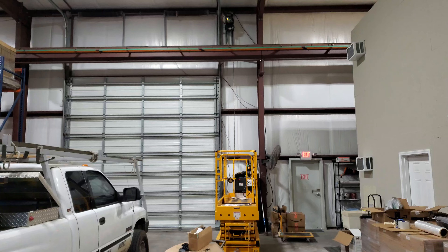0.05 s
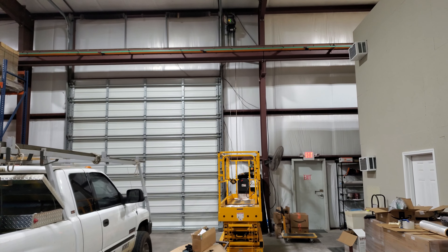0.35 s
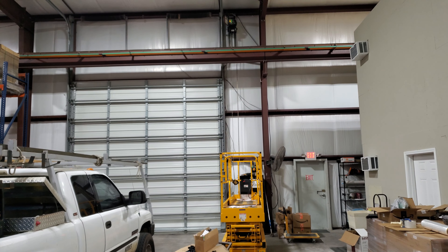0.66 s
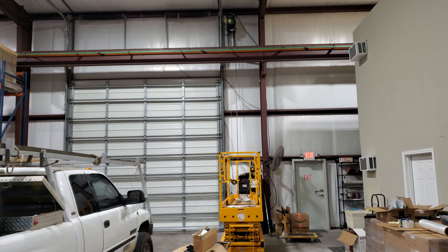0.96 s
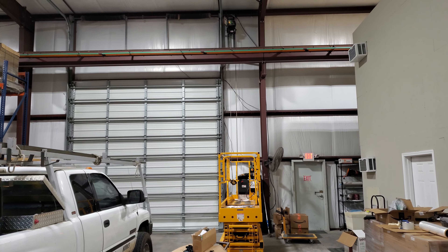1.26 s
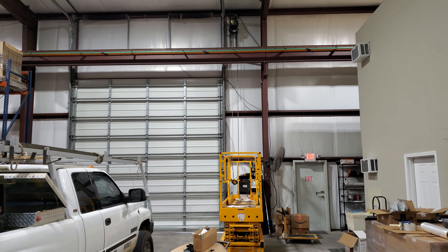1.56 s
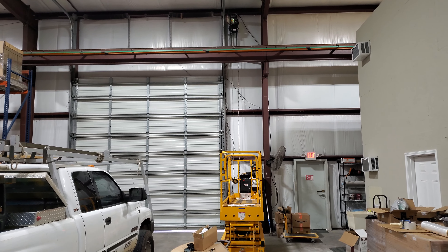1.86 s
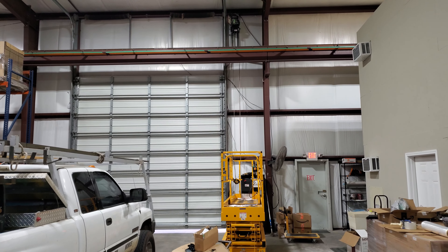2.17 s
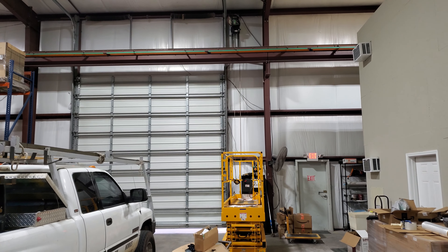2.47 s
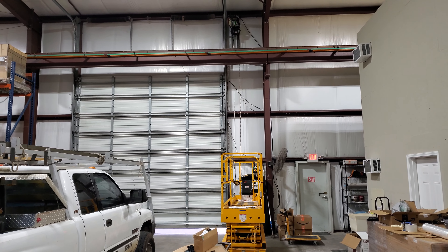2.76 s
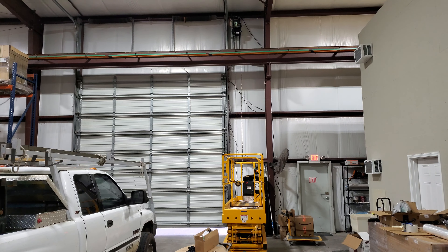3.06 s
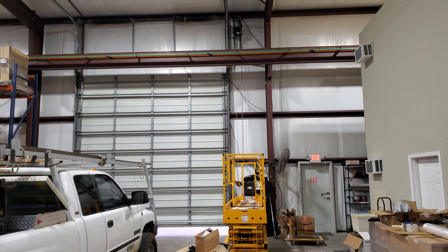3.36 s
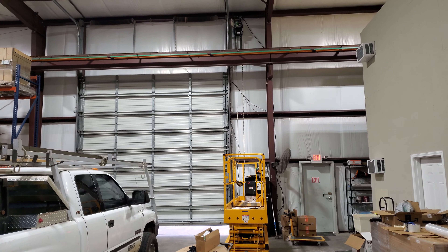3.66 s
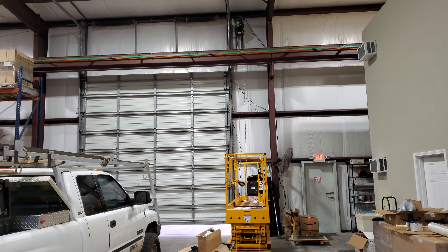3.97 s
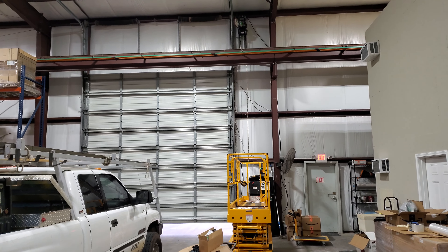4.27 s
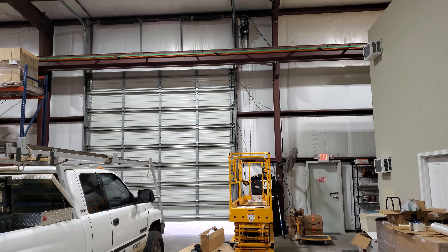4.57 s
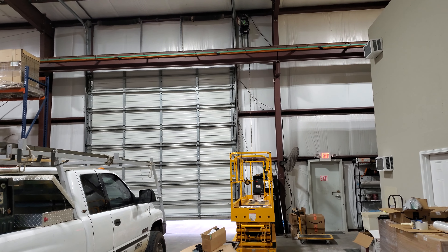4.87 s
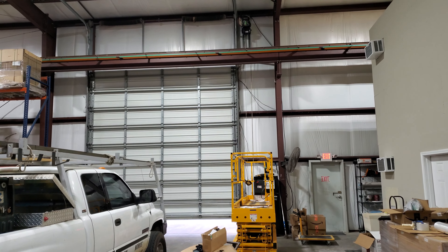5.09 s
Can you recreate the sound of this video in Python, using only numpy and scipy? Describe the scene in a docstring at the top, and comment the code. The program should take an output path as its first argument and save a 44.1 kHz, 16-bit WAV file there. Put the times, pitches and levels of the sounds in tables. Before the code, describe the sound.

A button clicks, a switch clacks, and a motorized overhead door rises with a hum, rumble and rattle in an echoing warehouse.

```python
"""A motorized sectional door starts to rise in a large steel warehouse.
First, over the low noise of the air, a push button clicks and creaks nearby. The motor's starter
switch clacks shut and the motor hums on mains power. Then the door panels rumble, rollers rattle
in their tracks, the chain jingles and hinges clank, all far off and washed in the hall's echo."""
import sys
import numpy as np
from scipy import signal
from scipy.fft import rfft, irfft, next_fast_len
from scipy.io import wavfile

SR = 44100
rng = np.random.default_rng(int(sys.argv[2]) if len(sys.argv) > 2 else 0)


def put_to_file(sound):
    """Save the sound as 16-bit audio at rate SR, in the file named by the first command-line argument."""
    columns = np.atleast_2d(sound).T  # one column per channel
    safe = np.clip(columns, -1, 1)
    whole_steps = np.round(safe * 32767)
    wavfile.write(sys.argv[1], SR, whole_steps.astype(np.int16))


N = 341334
TIME = np.arange(N) / SR
BLOW_SAMPLES = 2 ** 15  # room for one blow to die away
SWITCH_ON_S, RUN_UP_S = 1.2423, .06  # when the motor starts; how long the door's noise takes to come in
RUNNING_S = np.maximum(TIME - SWITCH_ON_S, 0)


def gain_of(db):
    """Turns decibels (dB) into a number to multiply a sound by."""
    return 10 ** (np.asarray(db) / 20)


def evened(x):
    """Scales a signal to an average strength (rms) of 1."""
    return x / np.sqrt(np.mean(x ** 2) + 1e-20)


def read(points, hz):
    """Looks up a table by frequency, sliding smoothly between its rows."""
    table_hz, value = np.transpose(points)
    return np.interp(np.log(hz + 1), np.log(table_hz + 1), value)


def level(points):
    """Joins rows of seconds and dB into a loudness curve."""
    return gain_of(np.interp(TIME, *np.transpose(points)))


def swell(peak_s, half_s):
    """A bell-shaped rise and fall, down to about a third at half_s either side of its peak."""
    return np.exp(-((TIME - peak_s) / half_s) ** 2)


def dying(fade_s):
    """A fade from 1. Every fade time here is the time taken to fall by 60 dB."""
    return np.exp(-np.log(1000) * TIME[:BLOW_SAMPLES] / fade_s)


def drift(rate_hz):
    """A random wobble of strength 1, mostly slower than rate_hz."""
    t = TIME[::64]
    hz = np.fft.rfftfreq(len(t), t[1])
    slow = rfft(rng.standard_normal(len(t))) / (1 + (hz / rate_hz) ** 2)
    return evened(np.interp(TIME, t, irfft(slow, len(t))))


def add(mix, start_s, sound):
    """Lays a stereo sound into the mix."""
    part = mix[:, round(start_s * SR):][:, :sound.shape[1]]
    part += sound[:, :part.shape[1]]


# How alike left and right are. Each row: frequency in Hz, likeness (1 the same, 0 unrelated).
STEREO_LIKENESS = [(130, 1), (300, 0.9), (600, 0.85), (1000, 0.32), (2000, -0.03), (4000, 0.2),
                   (8000, -0.02), (16000, 0.03)]
# How far the left wave runs ahead of the right. Each row: frequency in Hz, lead in radians.
LEFT_LEAD = [(400, 0.09), (860, 0.77), (1640, 0.75), (3100, -.5), (5000, -1.4), (7400, -0.49),
             (10000, -2.5), (16000, -2.35)]
# Which side is louder. Each row: frequency in Hz, left minus right in dB.
LEFT_BALANCE = [(60, -2), (150, -2.5), (300, 1), (1700, -0.9), (2500, 2.5), (3500, 0), (5000, -2.5),
                (6700, -2.5), (7900, 2), (10300, 3.5), (11600, -1), (14500, 5.5)]

def noise(colour, size=BLOW_SAMPLES, tilt_db=0):
    """Stereo noise of strength 1. The colour sets its tone; tilt_db per octave brightens it."""
    padded = next_fast_len(size, True)
    hz = np.fft.rfftfreq(padded, 1 / SR)
    left, unrelated = rfft(rng.standard_normal((2, size)), padded)
    same = np.clip(read(STEREO_LIKENESS, hz), -1, 1)
    right = (same * left + np.sqrt(1 - same ** 2) * unrelated) * np.exp(-1j * read(LEFT_LEAD, hz))
    side = gain_of(read(LEFT_BALANCE, hz) / 2)
    shape = gain_of(read(colour, hz) + tilt_db * np.log2(np.maximum(hz, 400) / 1000))
    return evened(irfft(np.array([left * side, right / side]) * shape, padded)[:, :size])


# How long the hall echoes. Each row: frequency in Hz, fade time in seconds.
HALL_FADE = [(100, 1.8), (500, 1.2), (1500, 0.99), (3000, 1.14), (6000, 0.77), (11000, 0.65), (16000, 0.58)]

def echo(colour, tilt_db=0, lasting=1):
    """The hall answers a blow with a blur of reflections; the treble dies first."""
    hz, t, slices = signal.stft(noise(colour, tilt_db=tilt_db), SR, nperseg=256)
    fade = gain_of(-60 * t / (lasting * read(HALL_FADE, hz)[:, None]))
    return signal.istft(slices * fade, SR, nperseg=256)[1][:, :BLOW_SAMPLES]


def ring(tones, extra_db=0):
    """A struck thing rings with all its tones; higher ones differ more between left and right."""
    hz, db, fade_s = np.transpose(tones)
    waves = np.exp((2j * np.pi * hz - np.log(1000) / fade_s)[:, None] * TIME[:BLOW_SAMPLES])
    start, apart = rng.uniform(-1.06, 1, (2, len(hz)))
    phase = np.pi * start + np.outer([1, -1], apart) * np.minimum(hz / 1600, 1)
    return ((gain_of(db + extra_db) * np.exp(1j * phase)) @ waves).imag


# The tone of the hall's air. Each row: frequency in Hz, relative level in dB.
AIR_COLOUR = [(20, -29), (35, -24), (55, 8), (100, -1.5), (200, -9), (300, -13.5), (450, -24), (650, -36.5),
              (1200, -38.5), (3000, -44.5), (7000, -54), (11000, -51), (16000, -43)]

def air():
    """The air in the hall makes a low, steady noise."""
    return gain_of(-55) * noise(AIR_COLOUR, size=N)


# The button's snaps. Each row: start in seconds, level in dB, pitch in Hz, fade time in seconds,
# scrape level in dB compared with the snap.
BUTTON_SNAPS = [(.6636, -33, 1940, 0.021, -18), (1.031, -58.5, 1475, 0.076, 8),
                (1.1033, -39.5, 1870, 0.027, -22), (1.114, -45.5, 3760, 0.065, -3),
                (1.149, -57, 3880, 0.038, 16), (1.2246, -35, 4850, 0.067, -1.5)]
# The tones of its housing. Each row: multiple of the snap's pitch, relative level in dB.
HOUSING_TONES = [(.66, -21), (.79, -9), (1, 1), (1.26, -18), (1.6, -12), (1.88, -12)]
# The tones of its spring. Each row: pitch in Hz, relative level in dB, fade time in seconds.
SPRING_TONES = [(1440, -9, 0.25), (1690, -6, 0.23), (3550, -2, 0.2), (3940, -3, 0.25), (4220, -10, .3),
                (6300, -12, .3), (6750, -11, .25)]
# The spring's bright scrape. Each row: frequency in Hz, relative level in dB.
SCRAPE_COLOUR = [(200, -2), (900, -10.5), (1500, -0.5), (2600, -11.5), (3900, 2), (5100, -7), (6600, -3),
                 (8300, -13), (10200, -3.5), (12000, -10), (14000, -5), (16000, -4.5)]

def button():
    """Each snap rings the button's housing and scrapes its spring; a longer scrape echoes more."""
    out = np.zeros((2, N))
    for start_s, db, hz, fade_s, scrape_db in BUTTON_SNAPS:
        tones = [(hz * multiple, tone_db, fade_s) for multiple, tone_db in HOUSING_TONES]
        housing = ring(tones) * (1 - dying(.006))
        echo_colour = [(hz / 3, -40), (hz * .75, -15), (hz * .86, -8), (hz, 0),
                       (hz * 1.3, -13), (hz * 1.9, -11), (hz * 2.6, -34), (hz * 8, -45)]
        snap = 1.2 * housing + gain_of(-24.5) * echo(echo_colour, lasting=.34)
        tail = gain_of(-5) * echo(SCRAPE_COLOUR, lasting=.52) + gain_of(-11.5) * ring(SPRING_TONES)
        scrape = noise(SCRAPE_COLOUR) * dying(fade_s * 1.5) + (fade_s / .051) ** 1.65 * tail
        add(out, start_s, gain_of(db) * (snap + gain_of(scrape_db) * scrape))
    return out


# The starter's slam and bounces. Each row: start in seconds, level in dB.
STARTER_HITS = [(1.2423, -16), (1.2466, -10.5), (1.2497, -16.5), (1.2572, -19)]
# The tones of its steel box. Each row: pitch in Hz, relative level in dB, fade time in seconds.
BOX_TONES = [(738, -14, .9), (792, -19, .6), (858, -2, .25), (1130, -16, .5), (1225, -11, .5),
             (1393, -12, .45), (1447, -8, .38), (1690, -16, .45), (1723, -15, .37), (2660, -17, .6),
             (2757, -16, .6), (2890, -16, .45), (3736, -18, .45), (4443, -11, .38), (4531, -14, .38),
             (4875, -14, .38), (5426, -18, .5), (6438, -22, .5), (9055, -21, .36), (10001, -18, .35),
             (10414, -17, .3), (11148, -11, .27), (11351, -12, .27)]
# The tone of the clack and of its echo. Each row: frequency in Hz, relative level in dB.
CLACK_COLOUR = [(60, -20), (500, -18), (850, -7), (1500, 6), (2250, -8.5), (2700, -1.5), (4600, -1.5),
                (6600, -3.5), (7100, -5), (8700, -5), (10000, -1), (11400, 6.5), (11900, -3), (16000, -8.5)]
CLACK_ECHO_COLOUR = [(50, 8), (130, 7.5), (300, 3), (700, -5), (1400, 5.5), (2200, -1.5), (3000, 2),
                     (5000, 3), (6500, 0.5), (7300, -5), (8800, -3.5), (11200, 2), (12200, -3),
                     (16000, -1.5)]

def starter():
    """The starter switch slams shut and bounces; its box rings on and the hall fills with echo."""
    out = np.zeros((2, N))
    clack = noise(CLACK_COLOUR) * (dying(.046) + .19 * dying(.076)) * (1 - dying(.002))
    for start_s, db in STARTER_HITS:
        add(out, start_s, gain_of(db) * clack)
    slam_s = STARTER_HITS[0][0]
    add(out, slam_s, gain_of(-21.5) * ring(BOX_TONES) * (1 - dying(.02)))
    add(out, slam_s, gain_of(-21) * echo(CLACK_ECHO_COLOUR) * (1 - dying(.06)))
    return out


# The hum's pitch sags briefly. Each row: time in seconds, pitch in Hz.
MOTOR_PITCH = [(1.3, 119), (1.6, 118.2), (1.8, 120)]
# The buzz from the first rush of current. Each row: multiple of the hum's pitch, peak level in dB.
BUZZ_TONES = [(2, -31.7), (3, -41), (4, -43.5)]
# The running hum, and the tone an octave above it. Each row: time in seconds, level in dB.
HUM_LEVEL = [(1.7, -39.0), (1.8, -30.7), (2.06, -36.3), (2.45, -30.0), (3.65, -32.2), (3.79, -39.0),
             (3.91, -31.9), (4.39, -40.0), (4.52, -32.5), (4.86, -40.4), (5.05, -32.5), (5.29, -34.8),
             (6.45, -32.3), (6.58, -38.8), (6.75, -30.7), (7.02, -36.1), (7.06, -31.3), (7.7, -31.6)]
OCTAVE_LEVEL = [(1.7, -48), (2.5, -60), (3.1, -51), (4.4, -51), (5.0, -44.3), (5.9, -46), (6.15, -51),
                (6.7, -47), (7.7, -47.5)]

def motor():
    """Magnetism makes the motor hum at twice the mains frequency; it surges as it takes the load."""
    surge_db, rise_s, hold_s, fall_s = -25.5, .18, .16, .096
    hz = np.interp(TIME, *np.transpose(MOTOR_PITCH))
    angle = 2 * np.pi * np.cumsum(hz) / SR + .05 * drift(3)
    at_speed = np.clip((RUNNING_S - rise_s - hold_s) / fall_s, 0, 1)
    surge = gain_of(surge_db) * np.minimum(RUNNING_S / rise_s, 1) ** 2 * (1 - at_speed) * np.sin(angle)
    current_rush = swell(SWITCH_ON_S + .15, half_s=.072) * (RUNNING_S > 0)
    buzz = current_rush * sum(gain_of(db) * np.sin(multiple * angle) for multiple, db in BUZZ_TONES)
    hum = level(HUM_LEVEL) * np.sin(angle) + level(OCTAVE_LEVEL) * np.sin(2 * angle)
    waver = gain_of(.4 * drift(5))
    left_right = gain_of([[-1], [.8]])
    return np.sqrt(2) * (surge + buzz + at_speed * waver * hum) * left_right


# The tone of the panels' rumble. Each row: frequency in Hz, relative level in dB.
RUMBLE_COLOUR = [(15, -36), (30, -28), (48, -3.5), (62, -5), (76, 3.5), (88, -1.5), (100, 4.5), (118, -7.5),
                 (150, -2), (178, -8), (205, -6), (260, -12.5), (340, -18.5), (600, -47)]
# How loud they rumble. Each row: time in seconds, level in dB.
PANEL_LEVEL = [(1.3, -31.5), (1.5, -36), (2.0, -34.5), (2.45, -39.5), (3.45, -36), (4.0, -39), (5.5, -39.5),
               (6.9, -38.5), (7.35, -35), (7.7, -38)]
# Their own low notes. Each row: peak time in seconds, half length in seconds, pitch in Hz, level in dB.
PANEL_NOTES = [(1.38, .14, 200, -48), (1.42, .06, 286, -46), (1.893, .099, 230, -44.5),
               (1.923, .12, 152, -44), (2.25, .2, 200, -47), (5.518, .12, 156.7, -45),
               (6.17, 0.29, 158, -37), (6.95, 0.72, 137.9, -39)]

def panels():
    """The big sheets rumble, and now and then one of their own notes swells and fades."""
    out = np.minimum(RUNNING_S / RUN_UP_S, 1) * level(PANEL_LEVEL) * noise(RUMBLE_COLOUR, size=N)
    waver = .7 * drift(5.4)
    for peak_s, half_s, hz, db in PANEL_NOTES:
        out += np.sqrt(2) * gain_of(db) * swell(peak_s, half_s) * np.sin(2 * np.pi * hz * TIME + waver)
    return out


def moving(base_db, jerk_db=0, settle_s=.1, growth_db_per_s=0, uneven_db=.25):
    """A moving part's loudness: it may start with a jerk, and grow as more panels ride over the bend."""
    jerk = jerk_db * np.exp(-RUNNING_S / settle_s)
    db = base_db + jerk + growth_db_per_s * RUNNING_S + uneven_db * drift(3)
    return np.minimum(RUNNING_S / RUN_UP_S, 1) * gain_of(db)


def knocking(colour, per_s, spread_db, burst):
    """Tiny knocks come from all over the door; each is a short burst, then a long echo."""
    knocks = rng.random(N) < per_s / SR
    strength = gain_of(spread_db * np.minimum(rng.exponential(1, N), 3))
    fade = dying(1) + burst * dying(.08)
    power = signal.oaconvolve(knocks * strength ** 2, fade ** 2)[:N]
    return evened(np.sqrt(abs(power))) * noise(colour, size=N)


def repeated(taps, sound):
    """Plays the same sound at every tap, and scales the result to strength 1."""
    return evened(signal.oaconvolve(taps[None], sound, axes=1)[:, :N])


# Moments when the wheels grind harder or run free. Each row: peak time in seconds,
# half length in seconds, extra rolling in dB, extra rattle in dB.
GRIND_MOMENTS = [(1.85, .12, 2, 2), (3.47, .14, 2.5, 1), (3.87, .12, 4, 5), (4.28, .11, 2, 3.2),
                 (4.65, .1, 1, 3.5), (4.86, .06, -2, -3), (5.03, .08, .5, 2.5), (5.52, .09, 1, 4.5),
                 (6.13, .1, -.5, -2), (6.7, .35, 2.3, 1.2), (7.45, .45, 0, 2.9)]
# The tone of the wheels, loose parts and chain. Each row: frequency in Hz, relative level in dB.
ROLL_COLOUR = [(120, -3.5), (300, 1.5), (560, 2.5), (660, 0), (880, -1), (1100, -8), (1500, -7),
               (2500, -38), (6000, -34)]
RATTLE_COLOUR = [(300, -15), (700, -6.5), (1150, 2.5), (1500, -0.5), (1800, 1), (2100, -.5), (2450, -7),
                 (3100, -8), (5000, -26), (16000, -54)]
JINGLE_COLOUR = [(1500, -20), (2400, -1.5), (3100, 0.5), (3500, 2), (3950, -2.5), (4300, -1.5),
                 (4520, -3.5), (4800, -4.5), (5500, -9), (6900, -10.5), (8500, -15), (16000, -30)]
# The steel hinges and tracks. Each row: pitch in Hz, relative level in dB, fade time in seconds.
STEEL_TONES = [(550, -4, .4), (799, -3.5, 0.6), (910, 2.5, 0.35), (1072, -0.5, 0.53), (1310, -3, 0.84),
               (1710, -3, 0.3), (2050, 2.5, 0.31), (2680, 2, 0.35), (2800, -9, 0.64), (2940, -2.5, 0.35),
               (3156, -1, 0.25), (3570, -7, .3), (4360, -16, 0.25), (5005, -10, 0.2)]

def rollers():
    """Wheels roll in the tracks, shake loose parts into ringing and set the chain jingling."""
    roll_grind = gain_of(sum(db * swell(peak_s, half_s) for peak_s, half_s, db, _ in GRIND_MOMENTS))
    rattle_grind = gain_of(sum(db * swell(peak_s, half_s) for peak_s, half_s, _, db in GRIND_MOMENTS))
    roll_gain = moving(-47.7, jerk_db=7, settle_s=1.1, uneven_db=.3) * roll_grind
    roll = knocking(ROLL_COLOUR, per_s=90, spread_db=2, burst=1.5)
    taps = (rng.random(N) < 120 / SR) * rng.standard_normal(N)  # about 120 a second
    ringing = gain_of(-12.5) * repeated(taps, ring(STEEL_TONES) * dying(.12))
    rattle_gain = moving(-53.5, growth_db_per_s=1.05) * rattle_grind
    rattle = knocking(RATTLE_COLOUR, per_s=260, spread_db=.5, burst=1.8) + ringing
    jingle_gain = moving(-52.3, jerk_db=1, growth_db_per_s=.08) * roll_grind ** .3
    jingle = knocking(JINGLE_COLOUR, per_s=140, spread_db=.5, burst=2.5)
    return roll_gain * roll + rattle_gain * rattle + jingle_gain * jingle


# The tone of the drive's hiss. Each row: frequency in Hz, relative level in dB.
HISS_COLOUR = [(500, -13), (3000, 5), (5000, -1), (7000, 2), (8200, -2), (10300, -1.5), (12000, 3),
               (13200, 3), (14400, 4.5), (16000, 3)]

def hiss():
    """A fine, bright hiss flickers and faintly pulses while the drive runs."""
    pulse_hz = 106.75
    angle = 2 * np.pi * pulse_hz * TIME + .35 * drift(2)
    pulsing = 1 + .06 * np.cos(angle) + .09 * np.cos(2 * angle)
    flicker = gain_of(.95 * drift(22))
    fade_in = np.minimum(RUNNING_S / .2, 1)
    return gain_of(-51) * fade_in * pulsing * flicker * noise(HISS_COLOUR, size=N)


# Knocks of hinges and rollers. Each row: start in seconds, level in dB, brightening in dB per octave,
# ringing level in dB compared with the echo.
HINGE_KNOCKS = [(1.345, -34.3, -4, -11), (1.568, -41, -2, -15), (1.600, -41.5, -8.5, -8),
                (1.7119, -37.7, 2.7, -9), (1.80, -43, -7.5, -11), (2.186, -46, -4.5, -8),
                (2.4943, -42.5, -5.5, -11), (3.08, -45, -6, -12), (3.276, -39, 1.5, -12.5),
                (3.3602, -39, 1.5, -14), (3.405, -42, 1, -13), (3.6589, -40.8, 2, -16),
                (3.7387, -43.5, 2, -14), (3.7907, -42.5, -3, -14), (3.8329, -40.3, -5.5, -2.5),
                (3.8682, -40, 1, -11), (3.9046, -41.5, -5, -2.5), (4.5546, -47, -3, -14),
                (4.9292, -47.5, 1, -13), (4.9965, -46.5, -2, -13), (6.2755, -47.5, -2, -12),
                (7.5868, -44.5, 0.5, -16)]
# The tone of their echo. Each row: frequency in Hz, relative level in dB.
CLANK_COLOUR = [(80, -7), (300, -2), (600, -3.5), (900, 6), (1400, 5.5), (1800, 6.5), (2300, 1), (2900, -1),
                (3800, -9), (5000, -11), (6000, -14.5), (8000, -20), (16000, -29)]

def clanks():
    """Panels fold over the track's bend: the steel rings, differently each time, inside a long echo."""
    out = np.zeros((2, N))
    octaves = np.log2(np.transpose(STEEL_TONES)[0] / 1000)
    for start_s, db, tilt_db, ring_db in HINGE_KNOCKS:
        wash = echo(CLANK_COLOUR, tilt_db, lasting=.91) * (1 + .87 * dying(.072))
        steel = ring(STEEL_TONES, extra_db=tilt_db * octaves + 2 * rng.standard_normal(len(octaves)))
        add(out, start_s, gain_of(db) * (wash + gain_of(ring_db) * steel) * (1 - dying(.021)))
    return out


# The tone of one chain link. Each row: frequency in Hz, relative level in dB.
LINK_COLOUR = [(1200, -9), (2800, -1), (4400, 0), (6000, -5), (7500, -4), (10000, -7.5), (15000, -12)]

def chain():
    """Links of the moving chain chink here and there."""
    taps = (rng.random(N) < 16 / SR) * rng.uniform(.3, 1, N)  # about 16 a second
    fade_in = np.minimum(RUNNING_S / 2, 1)
    return gain_of(-60) * fade_in * repeated(taps, noise(LINK_COLOUR) * dying(.094))


def dry_roller():
    """A dry roller squeals faintly on and off, most in the middle of the door's travel."""
    hz = 4500 + 75 * drift(120)
    squeal = evened(np.sin(2 * np.pi * np.cumsum(hz) / SR) * gain_of(4 * drift(14)))
    fade_in = np.minimum(RUNNING_S / 2, 1)
    left_right = gain_of([[-2], [2]])
    return gain_of(-66.5) * fade_in * swell(peak_s=4.6, half_s=1.9) * squeal * left_right


# Light metal ticks. Each row: start in seconds, level in dB.
METAL_TICKS = [(7.325, -48), (7.557, -44), (7.602, -46.5), (7.648, -49)]
# The tone of a tick. Each row: frequency in Hz, relative level in dB.
TICK_COLOUR = [(1500, -20), (4500, -3), (5400, 0), (5900, -1), (6500, -9), (8000, -12), (15000, -23)]

def ticks():
    """Metal ticks lightly a few times near the end."""
    out = np.zeros((2, N))
    for start_s, db in METAL_TICKS:
        add(out, start_s, gain_of(db) * noise(TICK_COLOUR) * dying(.14))
    return out


def scene():
    """The door and its drive, over the low noise of the hall's air."""
    return (air() + button() + starter() + motor() + panels() + rollers()
            + hiss() + clanks() + chain() + dry_roller() + ticks())


def record(dry):
    """The sound comes in after a moment of silence, with its very highest treble cut off."""
    start_s, cutoff_hz = .072, 15850
    fade_in = np.clip((TIME - start_s) * SR / 64, 0, 1)
    treble_cut = signal.firwin(511, cutoff_hz, window=("kaiser", 9), fs=SR)
    return signal.oaconvolve(dry * fade_in, treble_cut[None], "same")


dry = scene()
out = record(dry)
put_to_file(out)
```